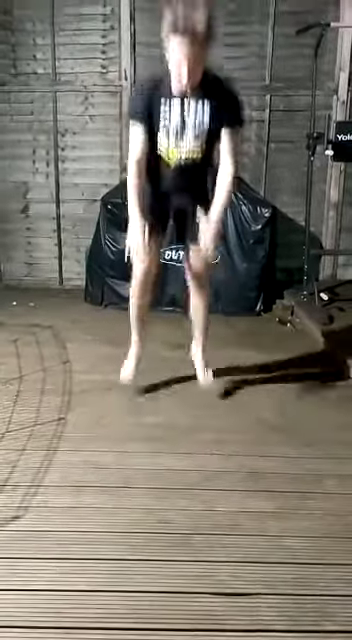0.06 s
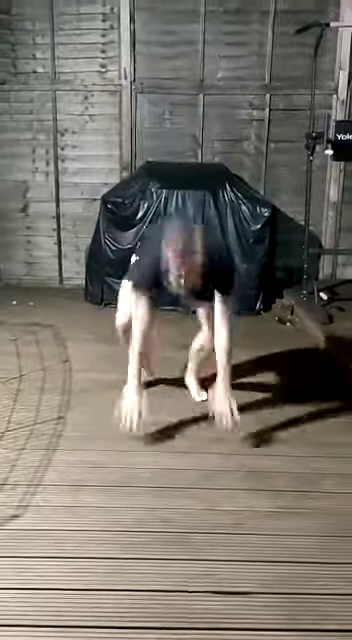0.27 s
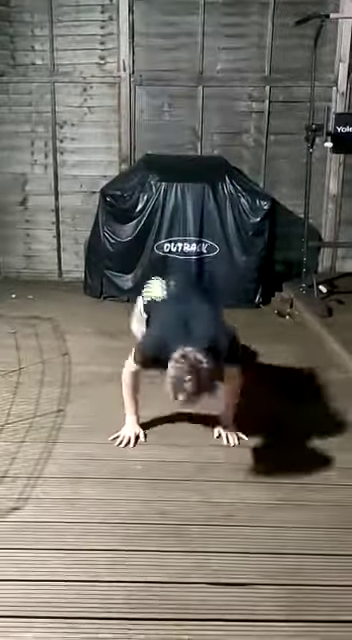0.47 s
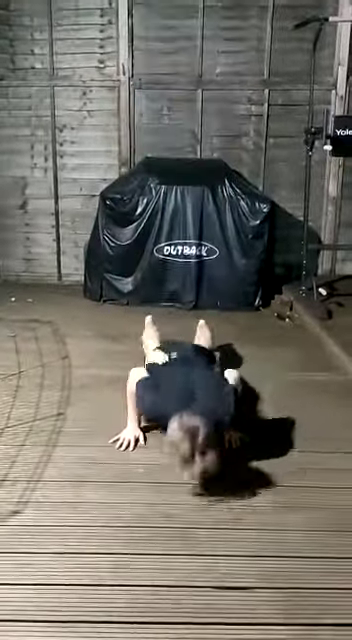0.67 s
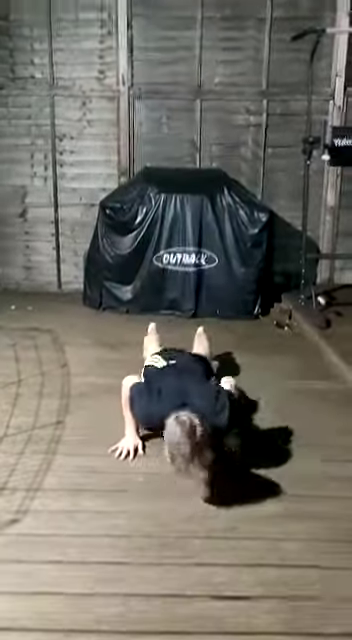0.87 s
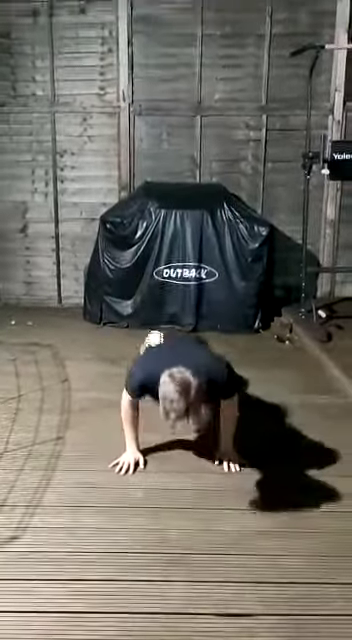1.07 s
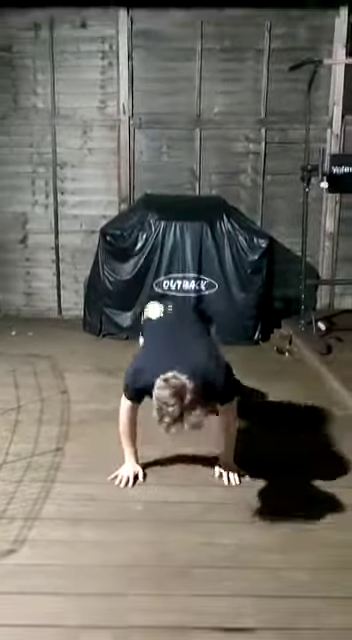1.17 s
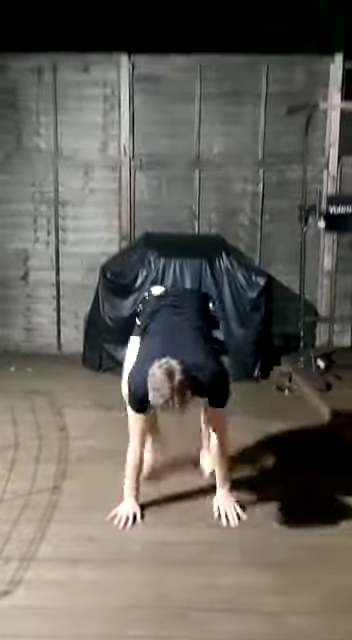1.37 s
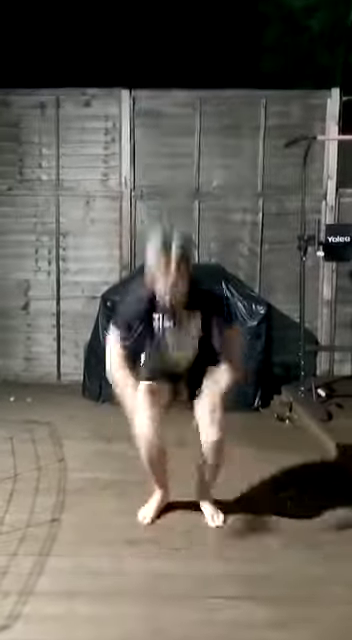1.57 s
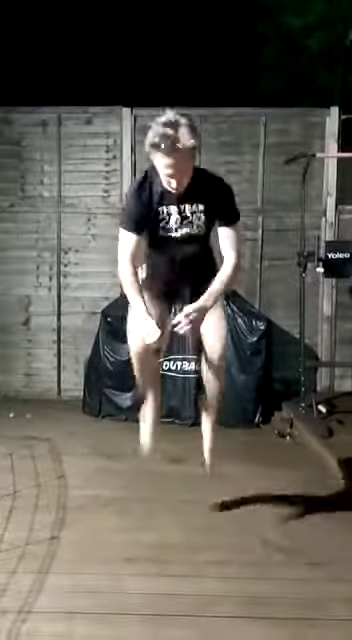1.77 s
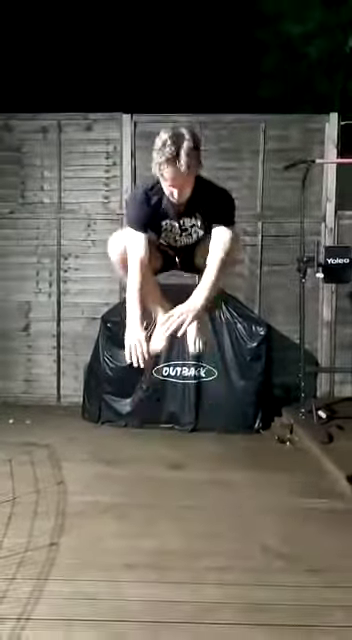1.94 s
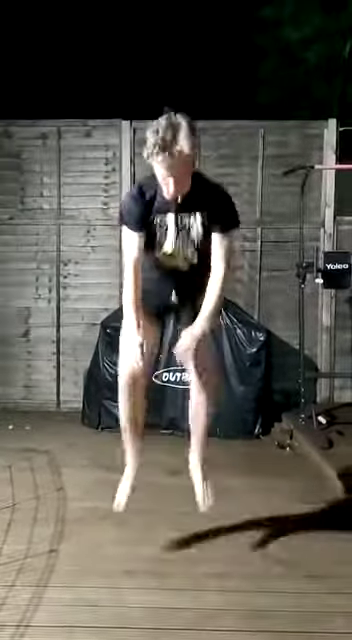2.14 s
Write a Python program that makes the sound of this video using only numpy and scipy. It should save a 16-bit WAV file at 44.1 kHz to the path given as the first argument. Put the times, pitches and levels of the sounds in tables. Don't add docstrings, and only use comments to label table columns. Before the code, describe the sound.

Two hollow wooden deck thuds, cloth swishes, sharp right-side clicks, and a lighter late landing

```python
import sys
import numpy as np
from scipy import signal
from scipy.io import wavfile
from scipy.ndimage import uniform_filter1d

SR = 44100
rng = np.random.default_rng(int(sys.argv[2]) if len(sys.argv) > 2 else 0)


def wrap_up_sound(samples):
    columns = np.atleast_2d(samples).T
    tamed = np.clip(columns, -1, 1)
    steps = np.round(tamed * 32767).astype(np.int16)
    wavfile.write(sys.argv[1], SR, steps)


def volts_from_decibels(level):
    exponent = np.asarray(level, float) / 20
    return 10 ** exponent


N = 97020

# [t/s, level/dB, favoured board/octaves above 330 Hz, joist share/dB]
BLOWS = [(.207, -9, -0.019, -28), (0.214, -8, 0.14, -17), (0.226, -6, 0.19, -8), (0.235, -6.5, -0.33, -30),
         (.262, -15, 0.1, -25), (0.288, -18, 0.23, -20), (0.301, -15.5, -0.53, 6.5), (.312, -17.5, 0.24, 1),
         (0.334, -18.5, -0.67, 8.5), (0.359, -22.5, 0.076, -15), (0.41, -6, 0.8, -37),
         (.421, -8.5, 0.64, -14.5), (.432, -13, 0.4, -4), (.443, -6, 0.24, -1.5), (.455, -6, 0.44, -4),
         (.465, -10, 0.22, 0), (0.475, -8, 0.54, -10.5), (.486, -4.5, -0.29, -20), (.506, -14, 0.16, 0),
         (.523, -22, 0.31, -3), (.537, -11, 0.087, -1.5), (.553, -20, 0.42, 4), (0.589, -24, 0.28, -18),
         (.624, -12, -0.65, -4.5), (0.651, -22.5, -0.42, 5), (0.676, -25, -0.42, -2),
         (.701, -29.5, 0.025, -4), (0.728, -31.5, -0.047, -2), (1.489, -25, 0.77, -15),
         (1.504, -16, 0.22, -11), (1.516, -11, -.2, -4.5), (1.527, -28, 0.063, 14.5),
         (1.545, -30, -0.051, 8), (1.563, -32, 0.14, 7), (1.599, -31, 0.029, 12.5),
         (1.64, -35.5, -0.38, -12), (1.68, -37.5, -0.13, 0)]
# [f/Hz, level/dB, t60/s]
BOARD_MODES = [(190.6, -1.5, 0.22), (224, -9.5, 0.04), (274.1, 3.5, 0.17), (299.7, 4, 0.2),
               (335.8, -2, 0.21), (395, 2.5, 0.056), (456, 0.5, 0.057), (547, -1.5, 0.12),
               (654, -5.5, 0.13), (765, 1, 0.12), (867, -23, 0.055), (1050, 0, 0.032)]
# [f/Hz, level/dB, t60/s]
JOIST_MODES = [(63.4, -27, 0.3), (96.8, -3, 0.28), (121.3, -4, 0.14), (156.4, -9.5, 0.13)]
# [t/s, loss/dB]
CLAMPS = [
    (0.257, -19),
    (0.281, -5),
    (0.495, -5),
    (0.52, -31),
    (.64, -7),
    (1.526, -14),
]
# [f/Hz, level/dB per Hz]
WASH_COLOUR = [(35, -63.5), (60, -60), (110, -21), (290, 1), (900, -18.5), (2000, -35.5), (7000, -65.5),
               (12500, -59), (16000, -80)]
# [f/Hz, t60/s]
WASH_T60 = [(100, 0.73), (500, 0.15), (2000, 0.54), (12000, 0.66)]
# [t/s, f/Hz, level/dB, t60/s]
TINGS = [(.232, 7575, -48.5, 0.11), (.275, 7540, -51, .06), (0.473, 3970, -44, .04),
         (.486, 3930, -47, 0.072), (.48, 7105, -49, 0.055), (0.49, 7123, -41, .05), (.507, 7150, -50, .06),
         (0.519, 7260, -46, 0.088), (.5, 7700, -51.5, 0.15), (0.518, 3970, -46, 0.17),
         (0.555, 3955, -49.5, 0.16), (0.6, 3950, -48.5, 0.18), (1.489, 2930, -41.5, 0.029),
         (1.501, 3150, -41.5, 0.048), (1.49, 1550, -40, 0.044), (1.601, 3990, -65, 0.17),
         (1.641, 4000, -64, 0.2)]
# [t/s, length/s, level/dB, f/Hz, width/Hz]
SCUFFS = [(0, 0.14, -72, 4300, 1500), (0.215, 0.0053, -42, 3030, 1520), (.216, 0.038, -38, 1500, 704),
          (.453, 0.01, -27.5, 1580, 594), (0.531, 0.026, -36, 1440, 594), (.27, .006, -49, 13100, 1800),
          (0.276, 0.022, -42.5, 2670, 1200), (0.368, 0.11, -52, 2740, 1500),
          (.416, 0.0095, -43.5, 11600, 1500), (0.436, 0.0071, -41, 13300, 2500),
          (0.557, 0.0043, -42, 11700, 2000), (1.266, 0.15, -84, 2850, 1570),
          (1.423, 0.033, -66.5, 2530, 2500), (1.549, 0.013, -50, 5000, 3000),
          (1.687, 0.013, -55, 2480, 2500), (1.729, 0.0044, -68, 11000, 5300),
          (1.747, 0.012, -51.5, 4380, 4940), (1.747, 0.007, -60, 12500, 4000),
          (1.796, 0.039, -55, 3230, 350), (1.801, 0.13, -55.5, 2380, 360), (1.968, 0.11, -58.5, 2260, 350),
          (2.073, .003, -55, 8000, 7980), (2.104, 0.28, -69, 4830, 2000)]
# [t/s, length/s, level/dB, tilt/dB per octave, fold colour/1]
SWISHES = [(0.204, 0.056, -42, -6, 0.2), (0.22, 0.29, -48.5, -1, 0.2), (0.386, 0.14, -40.5, -1, 0.6),
           (0.464, 0.2, -43.5, 4, 0), (0.545, 0.38, -54, -2.5, 0), (1.478, 0.18, -47, -1, 1),
           (1.677, 0.13, -57, -4, 0.7), (1.739, 0.083, -54, -4, 1), (1.789, 0.19, -49, 0, 1.2),
           (1.875, 0.33, -69.5, 1, .5), (1.964, 0.14, -48.5, 4.5, 0.3), (2.023, 0.14, -74, -6.5, 0),
           (1.57, 1, -63.5, -3, 0.45)]
# [f/Hz, level/dB per Hz]
CLOTH_COLOUR = [(500, 3), (1200, 10), (2300, -1.5), (5000, 5), (8000, -1.5), (12500, 5), (14800, 0.5),
                (16200, -47)]
# [f/Hz, level/dB]
FOLDS = [(2290, 8), (3270, 3)]
# [t/s, peak level/dB, quickness/1]
TICKS = [
    (0.8474, -8.5, 0.94),
    (0.8827, -13, 0.57),
    (0.9456, -9, 0.86),
    (0.9491, -25, 1.8),
    (1.2789, -8.5, 0.96),
    (1.3872, -8.5, 1.01),
    (1.4634, -5, 1.2),
    (1.5851, -3, 1.36),
]
# [delay/s, level/dB]
PORT_ECHOES = [(.0018, -23), (.0026, -22), (.0054, -30)]
# [f/Hz, level/dB, t60/s]
CASE_MODES = [(180, -35.5, 0.043), (266, -26, 0.083), (735, -9.5, 0.017), (12500, -26.5, 0.0048)]
# [t/s, f/Hz, level/dB]
HUM = [(.02, 60, -51), (.06, 60, -40), (.2, 57.4, -45.5), (.64, 59.35, -49), (.8, 56.3, -41),
       (.86, 60.5, -77), (1.0, 62, -49), (1.11, 57.9, -58.5), (1.198, 73.2, -57), (1.46, 75, -64),
       (1.65, 71.65, -41.5), (1.75, 72, -54), (1.83, 72.3, -41.5), (1.92, 71.5, -49), (2.03, 74.5, -82),
       (2.17, 76.4, -48.5)]
# [f/Hz, level/dB per Hz]
YARD_COLOUR = [(30, -21), (64, -7), (180, -12.5), (340, -9.5), (900, -25), (2200, -37.5), (7200, -55),
               (12500, -47.5), (16000, -54)]
# [t/s, level/dB]
YARD_SWELL = [(0, 0.5), (.05, -1), (.2, -1), (.9, 4.5), (1.15, -4), (1.45, -0.5), (1.8, 3.5), (2.2, 1)]
# [f/Hz, likeness/1]
WOOD_SAME = [(60, 0.75), (250, 0.93), (550, 0.57), (1650, 0.19), (5000, 0.018)]
# [f/Hz, L-R level/dB]
NEAR_LEAN = [(60, 7), (180, -3.5), (550, -1.5), (1650, -4.5), (4970, -2), (15000, -9.5)]
# [f/Hz, likeness/1]
YARD_SAME = [(60, 0.68), (240, 1), (950, 0.48), (3770, 0.011), (15000, 0.044)]
# [f/Hz, L-R level/dB]
YARD_LEAN = [(60, -6), (180, -6), (550, -7), (1650, -4), (4970, -11.5), (15000, -9.5)]


def evened(x):
    return x / np.sqrt(np.mean(x ** 2) + 1e-20)


def read(points, f_hz):
    f, value = np.transpose(points)
    return np.interp(np.log(f_hz + 1), np.log(f + 1), value)


def add(mix, t_s, sound):
    part = mix[..., round(t_s * SR):][..., :sound.shape[-1]]
    part += sound[..., :part.shape[-1]]


def lowpass(x, order, f_hz):
    return signal.lfilter(*signal.butter(order, f_hz, fs=SR), x)


def noise(field, colour, same, lean, patchy_db, size=512):
    hop = size // 4
    frames = N // hop + 5
    f_hz = np.fft.rfftfreq(size, 1 / SR)[:, None]
    a, b, c, d, patches = rng.standard_normal((frames, len(f_hz), 5)).T
    patches = uniform_filter1d(patches, size=5, axis=0)
    patches = evened(uniform_filter1d(patches, size=8, axis=1))
    like = np.clip(read(same, f_hz), -1, 1)
    right = a + 1j * b
    left = like * right + np.sqrt(1 - like ** 2) * (c + 1j * d)
    z = np.array([left * volts_from_decibels(read(lean, f_hz)), right])
    tone = volts_from_decibels(read(colour, f_hz))
    z *= tone / np.sqrt(np.sum(tone ** 2)) * volts_from_decibels(patchy_db * patches)
    z *= field(f_hz, np.arange(frames) * hop / SR)
    return signal.istft(z, nperseg=size, noverlap=size - hop)[1][:, :N]


def rings(modes, t, luck):
    f_hz, db, t60_s = np.transpose(modes)[:, :, None]
    detune = 0.028 * luck[1] * np.minimum(f_hz / 250, 1)
    phase = 2 * np.pi * f_hz * (1 + detune) * t + 2 * luck[2]
    level_db = db + 1.5 * luck[0] - 60 * t / t60_s
    return np.sum(volts_from_decibels(level_db) * np.sin(phase), 0)


def deck():
    DECK_DB, FAVOUR_DB_PER_OCT2 = -8, 14
    CONTACT_S, CLAMP_S = 0.0022, 0.0041
    t, near = np.arange(SR // 3) / SR, np.zeros(N)
    lucks = rng.standard_normal((len(BLOWS), 3, len(BOARD_MODES) + len(JOIST_MODES), 1))
    for (s, db, place_oct, joist_db), luck in zip(BLOWS, lucks):
        modes = []
        for f, g, t60 in BOARD_MODES:
            away_oct = np.log2(f / 330) - place_oct
            modes.append((f, g - FAVOUR_DB_PER_OCT2 * away_oct ** 2, t60))
        modes += [(f, g + joist_db, t60) for f, g, t60 in JOIST_MODES]
        held_db = 0
        for at, lost_db in CLAMPS:
            if at > s + .004:
                held_db = held_db + lost_db * np.clip((t + s - at) / CLAMP_S, 0, 1)
        attack = (1 - np.exp(-t / CONTACT_S)) ** 2
        add(near, s, volts_from_decibels(db + DECK_DB + held_db) * attack * rings(modes, t, luck))
    far = lowpass(near, 1, 900)
    far = far - 0.05 * np.roll(far, 40)
    return np.array([far * volts_from_decibels(-1.5), near * volts_from_decibels(3.0)])


def wood_wash():
    WASH_DB, LAG_S, PLACE_TILT_DB = -10, .005, 2.44

    def field(f_hz, t):
        octaves = np.log2(np.clip(f_hz, 150, 2500) / 330)
        t60_s = read(WASH_T60, f_hz)
        power = 0
        for s, db, place_oct, _ in BLOWS:
            since_s = np.maximum(t - s - LAG_S, -1e-9)
            level_db = db + PLACE_TILT_DB * place_oct * octaves + WASH_DB - 60 * since_s / t60_s
            power = power + volts_from_decibels(level_db) ** 2 * (since_s >= 0)
        return np.sqrt(power)

    return noise(field, WASH_COLOUR, WOOD_SAME, NEAR_LEAN, patchy_db=2.5)


def tings():
    ATTACK_S, WOBBLE = 0.0023, 0.31
    t, out = np.arange(SR // 4) / SR, np.zeros(N)
    for s, f_hz, db, t60_s in TINGS:
        wobble = 1 + WOBBLE * evened(uniform_filter1d(rng.standard_normal(len(t)), size=150))
        envelope = volts_from_decibels(db - 60 * t / t60_s) * np.minimum(t / ATTACK_S, 1)
        add(out, s, wobble * envelope * np.sin(2 * np.pi * f_hz * t))
    return out * volts_from_decibels(np.array([[-4], [3]]))


def scuffs():
    out = np.zeros((2, N))
    for s, length_s, db, f_hz, width_hz in SCUFFS:
        peak = signal.iirpeak(f_hz, f_hz / width_hz, SR)
        hiss = signal.lfilter(*peak, rng.standard_normal((2, 6000)))
        hiss = signal.lfilter(*peak, hiss)
        hiss = evened(hiss + 0.13 * hiss[::-1])
        u = np.arange(6000) / SR / length_s
        arch = np.sin(np.pi * np.minimum(u, 1) ** 0.56) ** 2
        add(out, s, volts_from_decibels(db + np.array([[-3], [2.5]])) * hiss * arch)
    return out


def cloth():
    GRAIN_DB, FOLD_WIDTH_HZ = 1.2, 130

    def field(f_hz, t):
        grain = volts_from_decibels(GRAIN_DB * evened(uniform_filter1d(rng.standard_normal(len(t)), size=3)))
        weave = sum(volts_from_decibels(db) / (1 + ((f_hz - fold_hz) / FOLD_WIDTH_HZ) ** 2) for fold_hz, db in FOLDS)
        octaves = np.log2((f_hz + 50) / 5000)
        total = 0
        for s, length_s, db, tilt_db, fold in SWISHES:
            u = np.clip((t - s) / length_s, 0, 1)
            arch = np.sin(np.pi * u ** 0.46) ** 2.8 + 1e-9
            total = total + arch * (1 + abs(fold) * weave) * volts_from_decibels(db + tilt_db * octaves)
        return grain * total

    return noise(field, CLOTH_COLOUR, YARD_SAME, NEAR_LEAN, patchy_db=0.5, size=256)


def membrane_push(t, quick):
    LIFT, PUSH_S, BACK, BACK_S = .13, .00042, .68, .00016
    LEAK_HZ, MESH_HZ = 120, 5450
    u = t * quick / PUSH_S

    def bump(at):
        return np.sin(np.pi * np.clip(u - at, 0, 1) ** .72) ** 2

    back = np.maximum(u - 1.3, 0) * PUSH_S / BACK_S
    push = LIFT * bump(0) - bump(.6) + BACK * back ** 2 * np.exp(2 - back) / 4
    push = signal.lfilter(*signal.butter(1, LEAK_HZ, "high", fs=SR), push)
    push = lowpass(push, 3, MESH_HZ)
    return push / abs(push).max()


def case_ring(t):
    LAG_S, RISE_S = .0013, .00042
    ring = sum(volts_from_decibels(db - 60 * t / t60_s) * np.sin(2 * np.pi * f_hz * (t - LAG_S))
               for f_hz, db, t60_s in CASE_MODES)
    return ring * (1 - np.exp(-t / RISE_S))


def ticks():
    FIZZ_DB, FIZZ_T60_S, ECHO_HZ = -35.5, 0.031, 1540
    t, out = np.arange(2000) / SR, np.zeros((2, N))
    case = case_ring(t)
    fizz_band = signal.butter(2, [9500, 15000], "band", fs=SR)
    for s, db, quick in TICKS:
        push = membrane_push(t, quick)
        fizz = signal.lfilter(*fizz_band, rng.standard_normal(len(t)))
        fizz = volts_from_decibels(FIZZ_DB - 60 * t / FIZZ_T60_S) * fizz
        add(out[1], s - 6e-5, volts_from_decibels(db) * (push - case + fizz))
        dull = lowpass(push, 1, ECHO_HZ)
        for delay_s, echo_db in PORT_ECHOES:
            add(out[1], s + delay_s * rng.uniform(0.94, 1.15), volts_from_decibels(db + echo_db) * dull)
    return out


def hum():
    WIDTH_HZ, FUZZ = 13, 0.17
    s, f_hz, db = np.transpose(HUM)
    t, r = np.arange(N) / SR, np.exp(-np.pi * WIDTH_HZ / SR)
    drift = signal.lfilter([1], [1, -r], rng.standard_normal(N) + 1j * rng.standard_normal(N))
    carrier = np.exp(2j * np.pi * np.cumsum(np.interp(t, s, f_hz)) / SR)
    tone = ((1 + FUZZ * drift / np.std(drift)) * carrier).real
    return evened(tone) * volts_from_decibels(np.interp(t, s, db) + np.array([[-4.5], [2.5]]))


def yard():
    FLOOR_DB = -48

    def field(f_hz, t):
        return volts_from_decibels(FLOOR_DB + np.interp(t, *np.transpose(YARD_SWELL)))

    return noise(field, YARD_COLOUR, YARD_SAME, YARD_LEAN, patchy_db=1.2, size=1024)


def scene():
    return deck() + wood_wash() + tings() + scuffs() + cloth() + ticks() + hum() + yard()


def low_pass(x):
    return signal.sosfilt(signal.butter(12, 15900, fs=SR, output="sos"), x)


def record(dry):
    cut = signal.sosfilt(signal.butter(4, 48, "high", fs=SR, output="sos"), dry)
    limited = 1.087 * np.tanh(cut / 1.212)
    return low_pass(limited)


dry = scene()
out = record(dry)
wrap_up_sound(out)
```